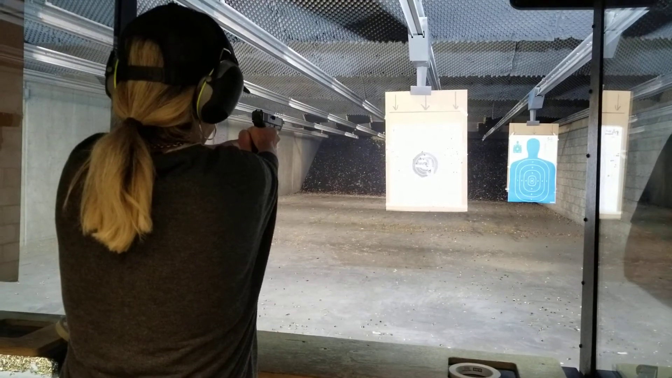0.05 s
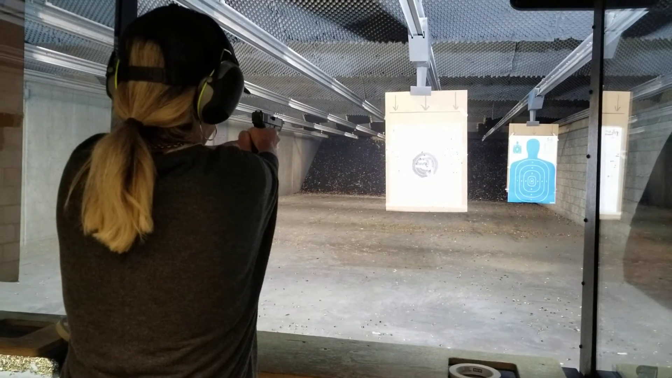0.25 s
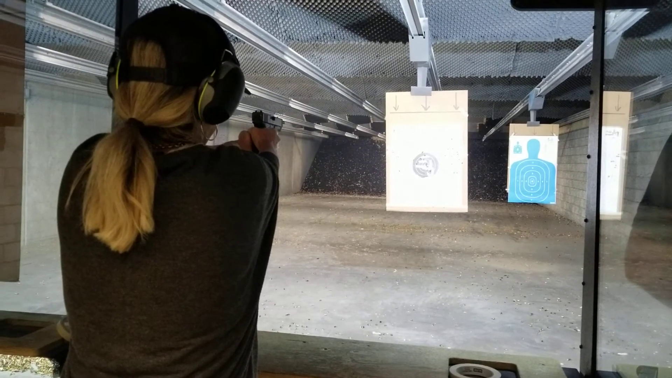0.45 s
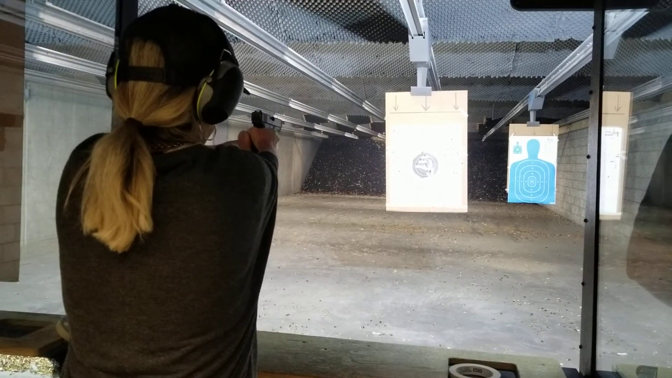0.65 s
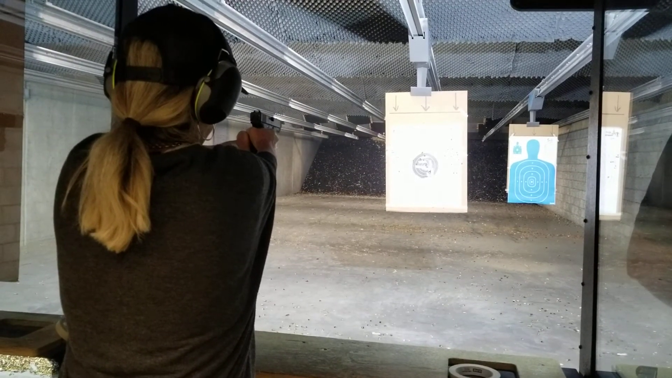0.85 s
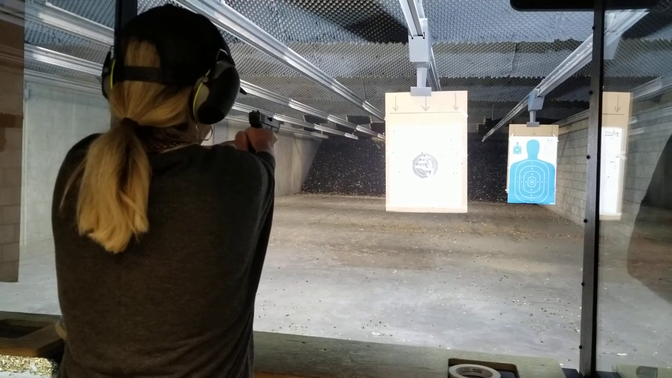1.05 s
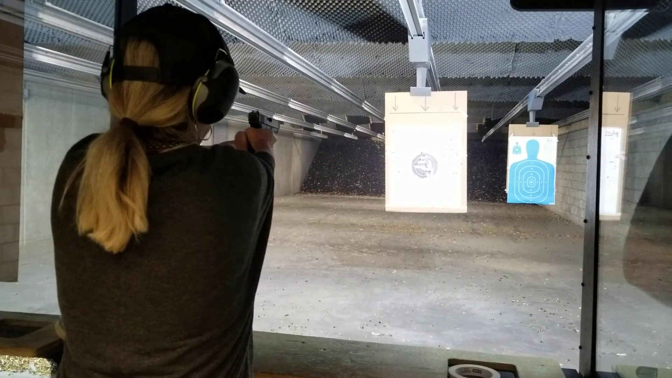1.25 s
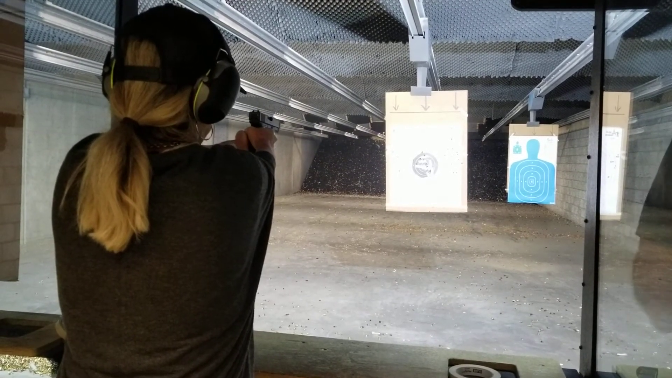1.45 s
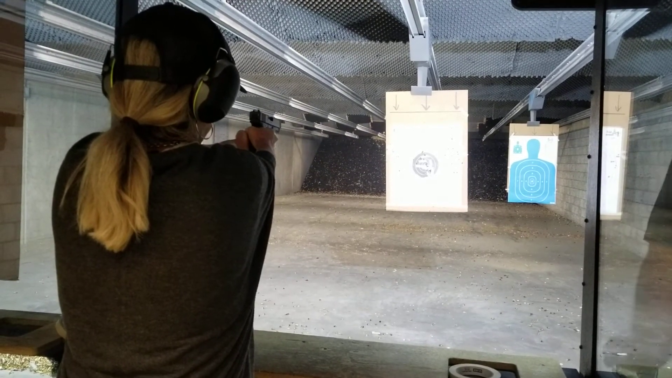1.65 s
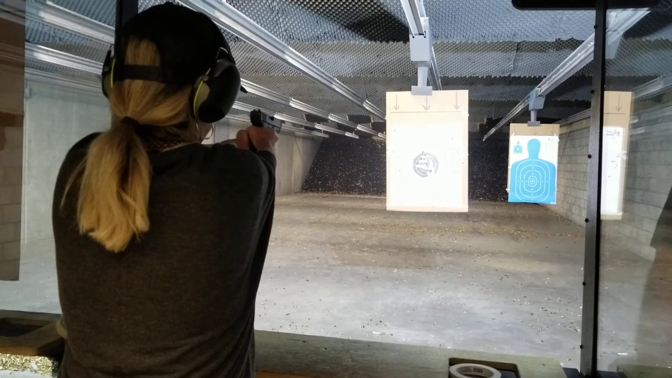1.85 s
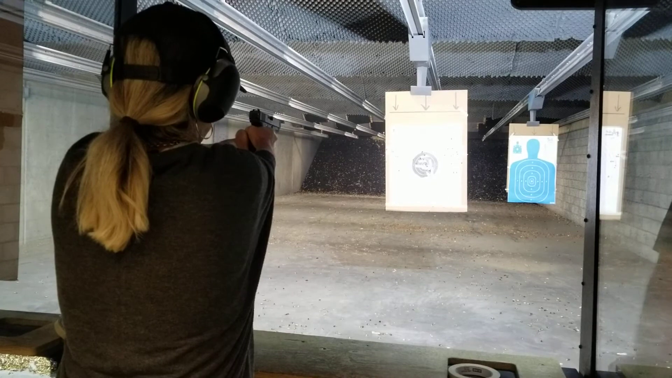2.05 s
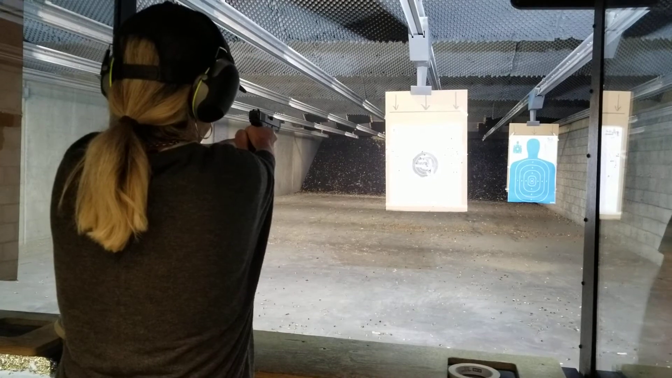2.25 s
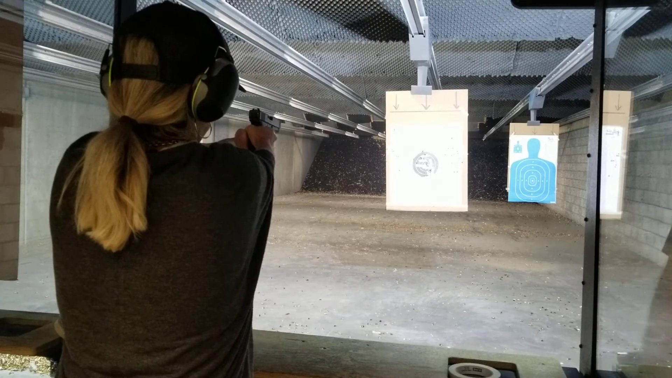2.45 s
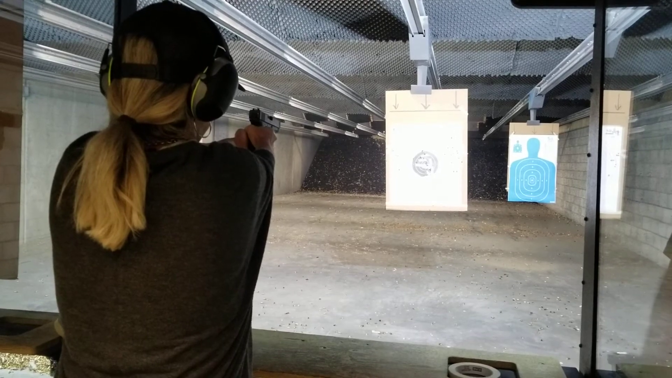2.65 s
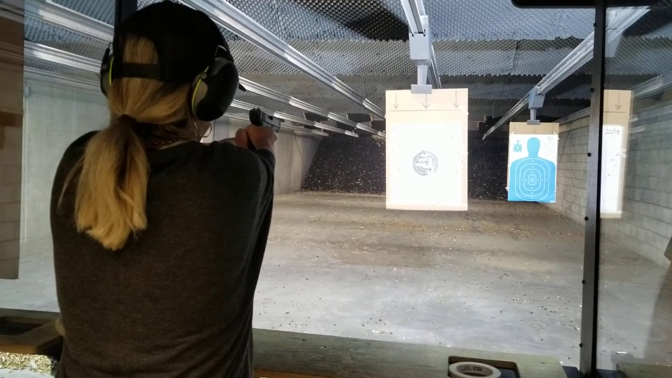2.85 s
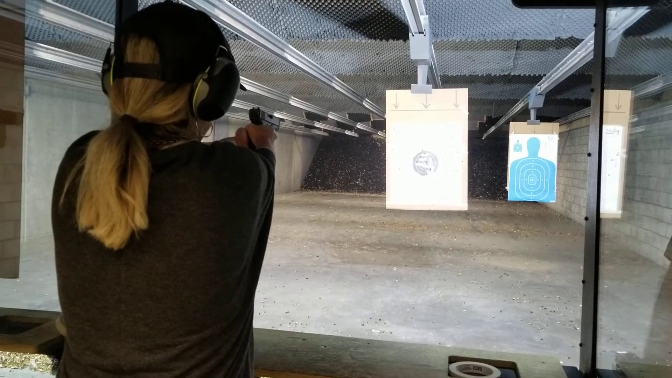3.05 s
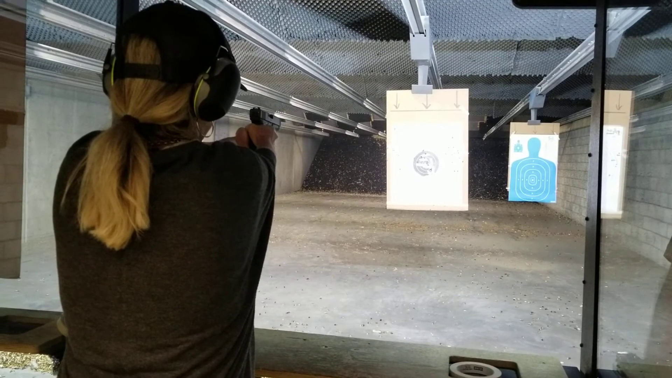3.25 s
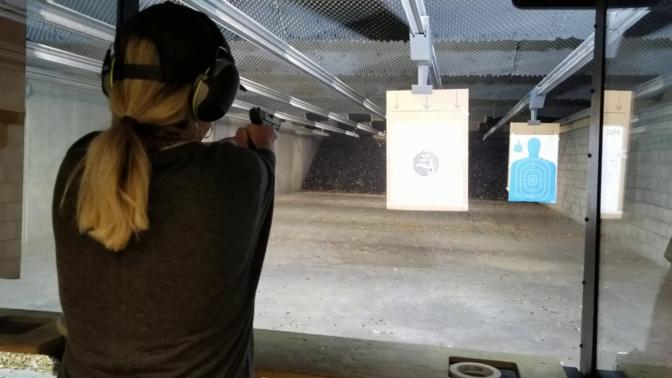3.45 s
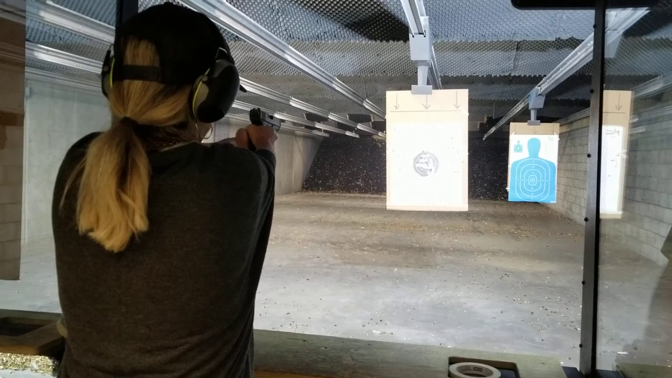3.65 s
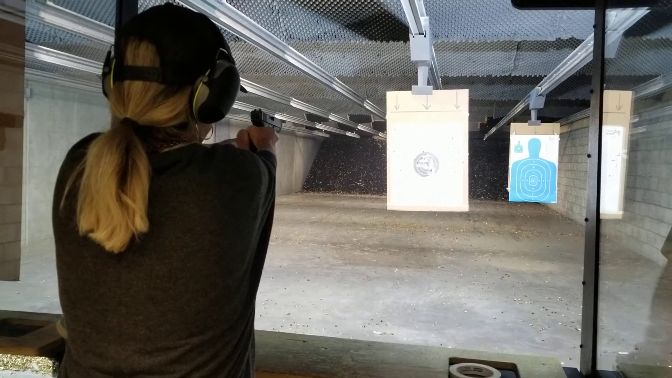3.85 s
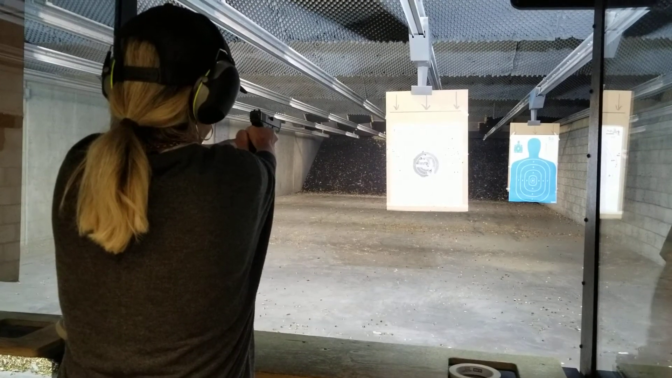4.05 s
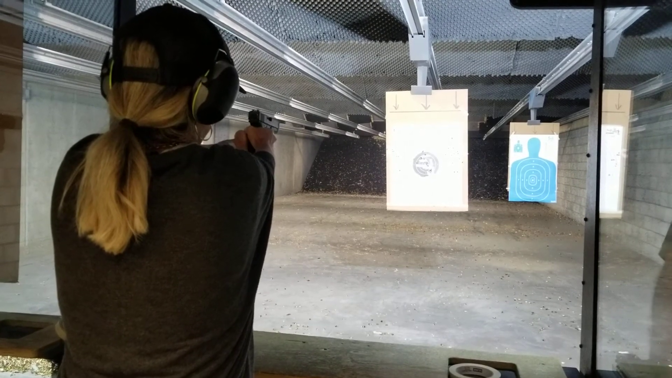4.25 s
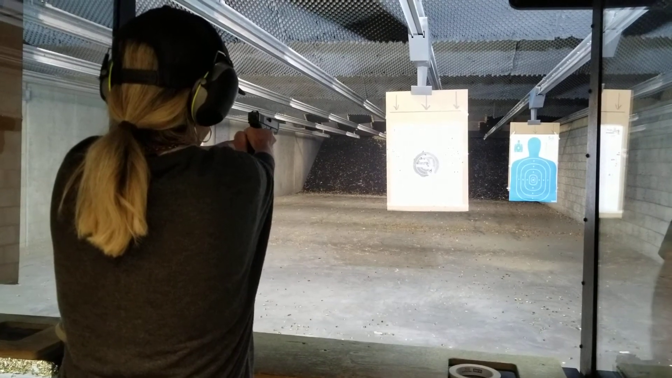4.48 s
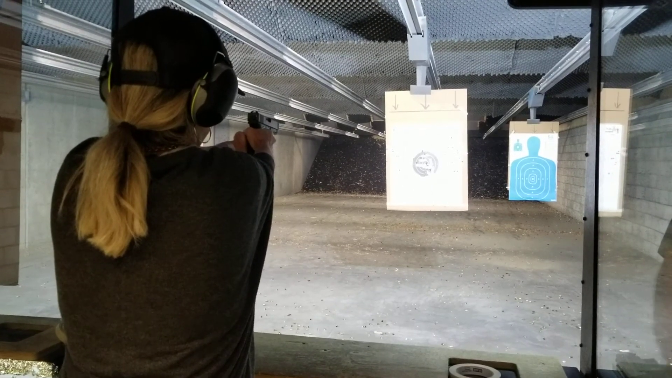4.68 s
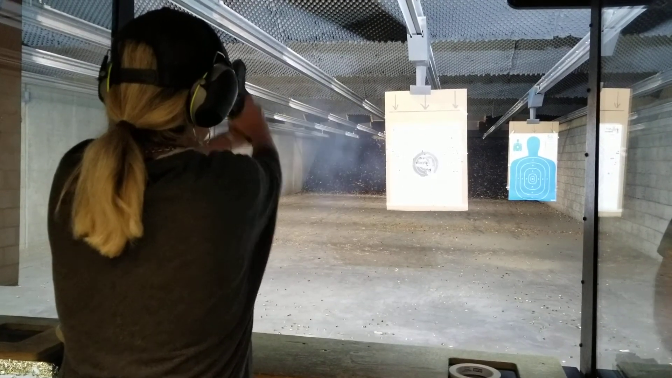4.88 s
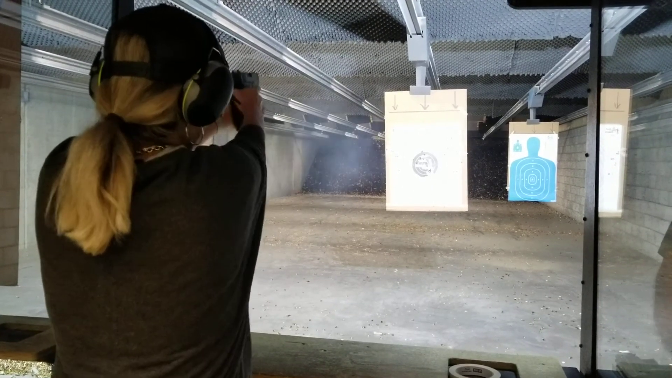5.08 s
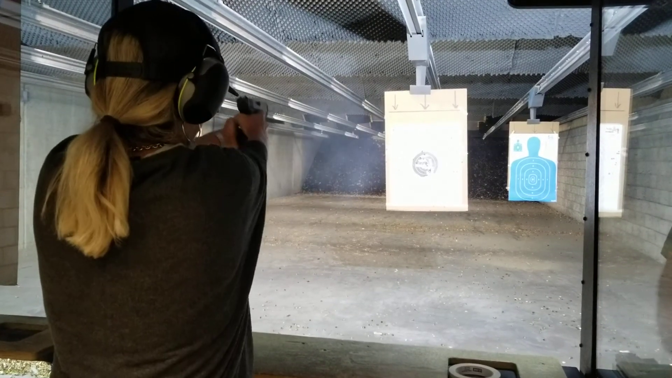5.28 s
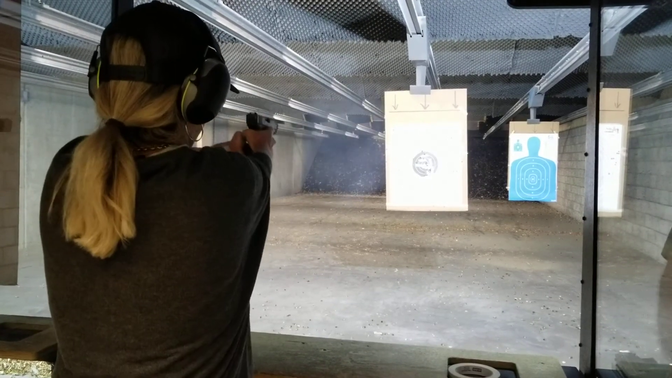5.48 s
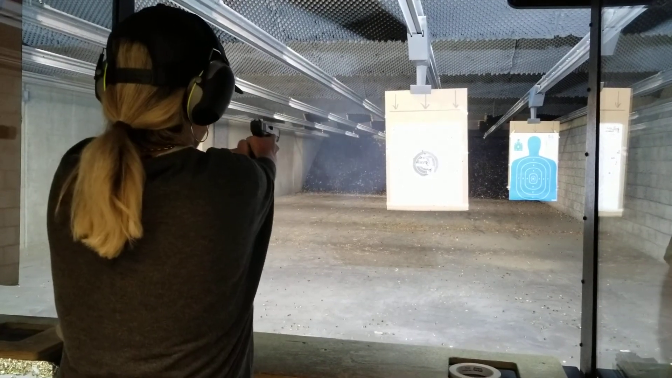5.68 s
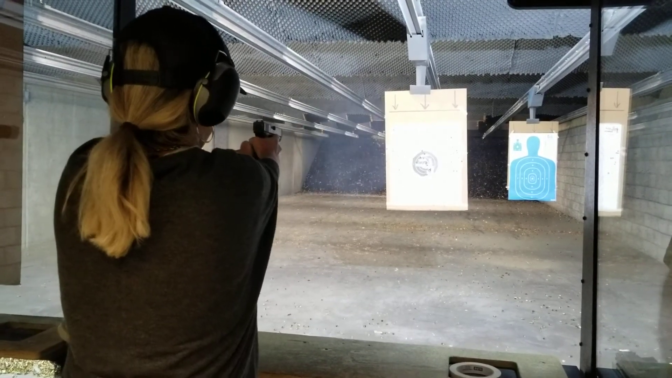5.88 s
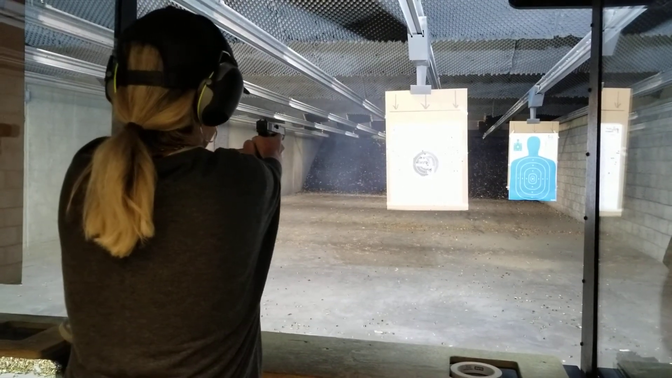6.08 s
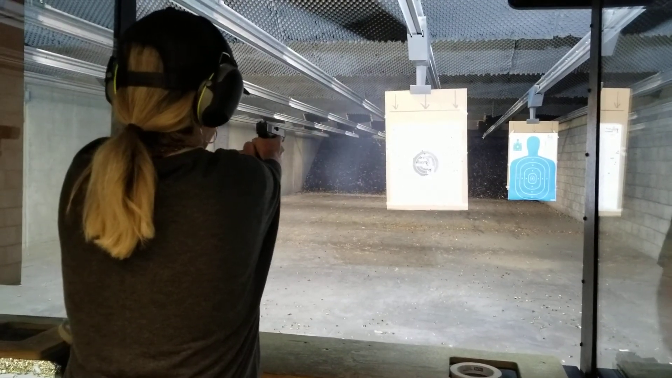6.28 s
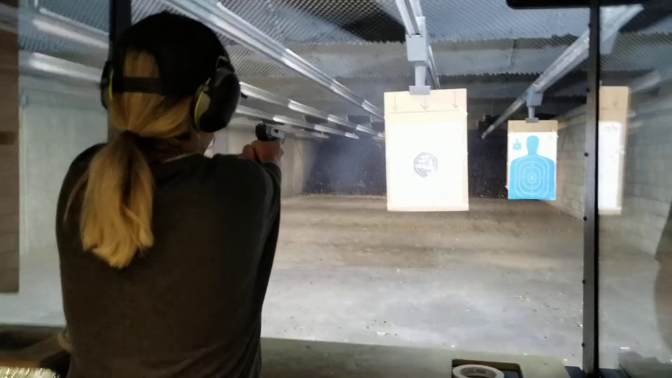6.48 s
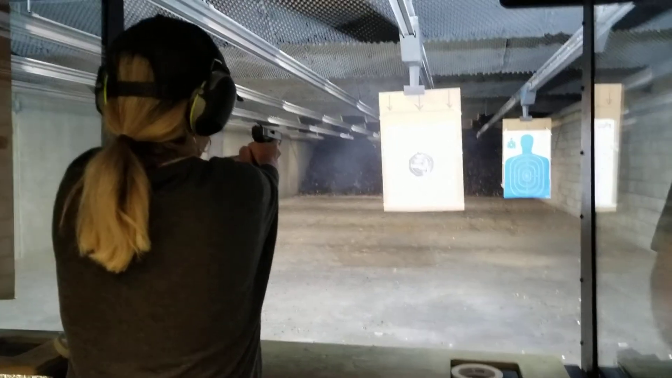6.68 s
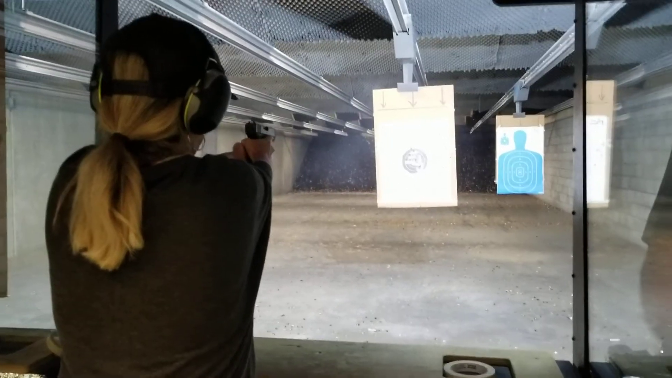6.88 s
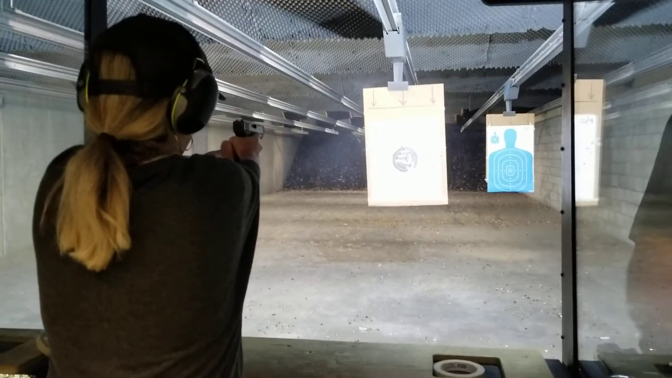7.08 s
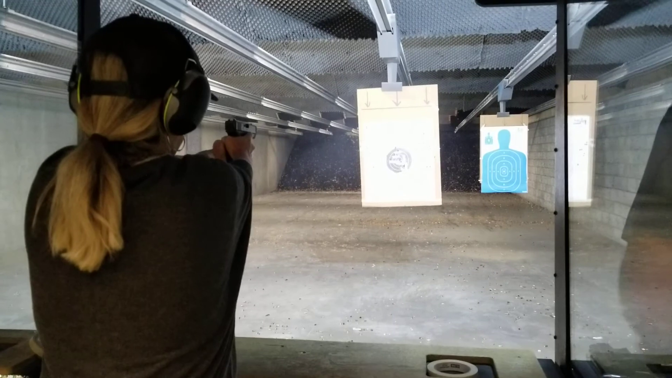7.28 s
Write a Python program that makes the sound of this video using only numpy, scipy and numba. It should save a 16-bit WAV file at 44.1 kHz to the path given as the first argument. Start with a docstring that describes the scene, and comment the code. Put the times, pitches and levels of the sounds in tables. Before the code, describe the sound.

A low ventilation rumble and fan hum fill a concrete indoor shooting range, with a very faint, thin electrical whine. Soft knocks, small clicks and rustles come from the next booth. At about 1.1 seconds a steel part snaps shut with a bright, short ring. A few knocks around 2.4 seconds lead to a hard case banging hollowly onto a bench at 2.7. After quieter handling, a pistol fires once, close by, at 4.8 seconds: by far the loudest sound, an overloaded blast with a sizzling crack, a deep boom and a tail fading over one to two seconds. Everything else ducks, then slowly recovers from about 6 seconds. The spent brass casing bounces on the floor with light, high pings at 5.7, 6.3 and 6.6 seconds, among a brief rustle and a small metallic clink. Two quick knocks land around 7 seconds.

```python
"""One pistol shot in a concrete indoor range. Over the drone of the ventilation, gear knocks and rustles
in the next booth, a steel part snaps shut (1.1 s) and a hard case bangs down on a bench (2.7 s).
At 4.8 s the pistol fires close by: the blast overloads the microphones and the gain control ducks
everything while the hall dies away. From 5.7 s the spent brass bounces on the floor and the level
slowly recovers; two more knocks land near the end."""
import sys
import numpy as np
from scipy import signal
from scipy.fft import rfft, irfft, next_fast_len
from scipy.io import wavfile
from scipy.ndimage import uniform_filter1d
from numba import njit

SR = 44100
rng = np.random.default_rng(int(sys.argv[2]) if len(sys.argv) > 2 else 0)


def materialize(psi):
    """Save the field psi as 16-bit PCM at rate SR to the path in sys.argv[1].

    A 1-D psi becomes a single channel; in a 2-D psi each row is a channel.
    """
    bounded = np.clip(np.atleast_2d(psi).T, -1, 1)
    quanta = np.round(bounded * 32767).astype(np.int16)
    wavfile.write(sys.argv[1], SR, quanta)


N = 323253
T = np.arange(N) / SR

# body of the muzzle blast (f/Hz, level/dB)
BLAST_EQ = [(30, 20.5), (70, 38), (150, 36.5), (280, 41.5), (410, 40.5), (520, 38.5), (750, 42.5),
            (1400, 39), (2800, 28.5), (4200, 26), (6000, 24), (10000, 20), (16000, 9.5)]
# slapbacks from down the lanes (delay t/s, level/dB)
SLAPBACKS = [(.011, 1), (.034, -4), (.058, -13.5), (.085, -12.5)]
# bright, short sizzling crack at the start of the overloaded shot (f/Hz, level/dB)
SHOT_CRACK_EQ = [(2000, 15), (7000, 27.5), (11000, 35), (16000, 28)]
# slow tail from the far end of the lanes (f/Hz, level/dB)
TAIL_EQ = [(300, -34), (700, -10.5), (1200, -5), (2000, -8.5), (3500, -27.5), (7000, -44.5)]
# boom of a panel shaken by the blast (f/Hz, level/dB, 60 dB decay t/s)
PANEL_MODES = [(97, 4.5, 1.5), (146, 5.5, 0.65)]

def shot(at_s=4.794, front_db=-20, front_half_s=.00054, crack_t60=.19, tail_t60=2.0):
    """An N-shaped pressure front and its slapbacks fill the hall; a crack sizzles and a panel booms."""
    blast = np.zeros((2, N))
    for delay, db in [(0, 0)] + SLAPBACKS:
        path = room(booth_t60=.2, hall_db=-22.5, build_s=.0012)
        add(blast, at_s + delay, undb(db) * path)
    front = np.linspace(1, -1, int(2 * front_half_s * SR))
    add(blast, at_s, undb(front_db) * front)
    blast = colour(blast * np.sqrt(SR / 50), BLAST_EQ)  # same energy scale as contact()
    add(blast, at_s, colour(diffuse(SR), SHOT_CRACK_EQ) * fade(T[:SR], crack_t60))
    add(blast, at_s, colour(diffuse(2 * SR), TAIL_EQ) * fade(T[:2 * SR], tail_t60))
    add(blast, at_s, ring(PANEL_MODES))
    return blast


# clicks of spent brass on the floor, the first followed 10 ms later by its reflection
# (t/s, click level/dB, top-end level/dB, ring level/dB re click)
BRASS_CLICKS = [(5.749, -27, -3, 2), (5.759, -22, -3, 1), (6.347, -21.5, 0, -2), (6.592, -23.5, -3, 2),
                (6.73, -31.5, -3, -14)]
# ping of the brass tube (f/Hz, level/dB, 60 dB decay t/s)
BRASS_MODES = [(3920, -22, 0.036), (4350, -14, .05), (6907, -16.5, 0.25), (11550, -24, .22),
               (13750, -30, .18)]
# brass-on-concrete click, below its top end (f/Hz, level/dB)
BRASS_CLICK_EQ = [(500, -20), (1800, -8), (4000, -5.5), (6000, -5), (8000, 0.5)]
# glint on the sound that comes straight off the floor (f/Hz, level/dB)
GLINT_EQ = [(1500, -13), (3500, -1), (8000, -1), (10500, -4), (12500, 8), (15000, -1)]

def casing(response, direct_db=-1, room_db=1.5, predelay_s=.004):
    """The brass casing clicks on concrete and rings; the duller room answers a moment later."""
    brass = np.zeros(N)
    for s, db, top_db, ring_db in BRASS_CLICKS:
        eq = BRASS_CLICK_EQ + [(12000, top_db - 4), (15000, top_db)]
        add(brass, s, undb(db + ring_db) * ring(BRASS_MODES))
        add(brass, s, undb(db) * colour(contact(.003, scatter=.89), eq))
    out = np.tile(undb(direct_db) * colour(brass, GLINT_EQ), (2, 1))
    add(out, predelay_s, undb(room_db) * reverb(brass, response))
    return out


# a steel part snapping shut (t/s, level/dB)
CLANKS = [(1.149, -12.5), (1.156, 2.5), (1.168, -4)]
# its bright crack (f/Hz, level/dB)
STEEL_EQ = [(600, -47), (1200, -31), (3000, -27.5), (4600, -25.5), (6000, -31.5), (9000, -18.5),
            (12000, -24), (16000, -36.5)]
# its metallic ring (f/Hz, level/dB, 60 dB decay t/s)
STEEL_MODES = [(1245, -31, .1), (1752, -39, .1), (2800, -36, .05), (3240, -41, .1), (4604, -28.5, .07),
               (6872, -38, .1), (11200, -29, .06), (11500, -28.5, .07)]

def clank():
    """Steel slides home in three quick contacts and rings from the hardest."""
    out = np.zeros(N)
    for s, db in CLANKS:
        add(out, s, undb(db) * colour(contact(.006), STEEL_EQ))
    add(out, CLANKS[1][0], ring(STEEL_MODES))
    return out


# a hard case banged down on a bench (t/s, level/dB)
BANGS = [(2.740, -16.5), (2.745, -10), (2.749, -4.5)]
# its hollow crack (f/Hz, level/dB)
BANG_EQ = [(100, -5), (200, -31), (350, -0.5), (520, -8.5), (850, -3), (1300, -9.5), (2000, -11.5),
           (3200, -17), (4500, -23), (6800, -26.5), (9000, -26.5), (16000, -42)]

def bang():
    """One edge touches, then the whole case lands."""
    out = np.zeros(N)
    for s, db in BANGS:
        add(out, s, undb(db) * colour(contact(.00137, scatter=.5), BANG_EQ))
    return out


# gear set down (t/s, contact t/s, body level/dB, crack level/dB re body, ring f/Hz)
KNOCKS = [(0.001, 0.054, -22, -19.5, 1633), (.056, 0.03, -27, -21.5, 1610), (.112, 0.021, -29, -14, 1590),
          (2.392, .012, -19.5, -14, 1930), (2.431, 0.023, -21.5, -14.5, 380),
          (2.503, 0.018, -22.5, -14, 735), (4.067, 0.017, -36, -15.5, 2004),
          (6.953, 0.0076, -11.5, -27.5, 710), (7.001, 0.0065, -11, -24.5, 771)]

def knocks(ring_db=-7, ring_t60=.049, sizzle_db=-7, bass_db_per_doubling=5.5, firm_contact_s=.018):
    """Blows on a bench: hollow body, crack and sizzle from hard edges; the object rings briefly."""
    out = np.zeros(N)
    for s, contact_s, body_db, crack_db, hz in KNOCKS:
        # a softer, longer contact pushes more bass into the bench
        bass_db = bass_db_per_doubling * np.log2(contact_s / firm_contact_s)
        top_db = crack_db + sizzle_db
        body_eq = [(100, bass_db - 16), (370, bass_db - 4.5), (520, -5), (850, -1.5), (1300, -3.5)]
        edge_eq = [(3200, crack_db), (6500, crack_db - 3), (11000, top_db), (16000, top_db - 3)]
        add(out, s, undb(body_db) * colour(contact(contact_s, scatter=4.5), body_eq + edge_eq))
        add(out, s, ring([(hz, body_db + ring_db, ring_t60)]))
    return out


# small hard parts being handled (t/s, contact t/s, level/dB, sizzle level/dB re click)
CLICKS = [(0.261, .014, -45.5, -15), (.331, 0.023, -38, -5), (.601, 0.066, -38.5, -10),
          (0.833, 0.0021, -42.5, -12), (1.29, 0.026, -38, -24), (1.788, 0.0054, -51, -15),
          (3.024, .006, -46, -6), (3.085, 0.0045, -49, -8), (4.263, 0.0043, -38, -20),
          (5.422, .009, -28, -18), (5.456, .009, -20.5, -19), (5.506, .012, -22.5, -19),
          (6.665, .002, -23, -5)]
# their shared tone below the sizzle (f/Hz, level/dB)
CLICK_EQ = [(100, -17), (370, -6), (800, -2.5), (1300, -1.5), (3200, -2.5), (6500, -1.5)]
# clink of a small metal piece (f/Hz, level/dB, 60 dB decay t/s)
CLINK_MODES = [(2869, -41, .16), (4960, -35, 0.22), (5356, -33, 0.21), (5100, -38, .16)]

def clicks():
    """Light, hard contacts with little body; the last one sets metal ringing."""
    out = np.zeros(N)
    for s, contact_s, db, sizzle_db in CLICKS:
        eq = CLICK_EQ + [(11000, sizzle_db), (16000, sizzle_db - 3)]
        add(out, s, undb(db) * colour(contact(contact_s, scatter=4.5), eq))
    add(out, CLICKS[-1][0], ring(CLINK_MODES))
    return out


# sleeves and packaging (peak t/s, half-width t/s, level/dB, sizzle level/dB re body)
RUSTLES = [(0.499, 0.032, -42, 12.5), (0.93, 0.1, -51, 7), (1.806, 0.037, -42.5, -19),
           (1.98, 0.042, -53, 5.5), (2.248, 0.042, -55.5, 7), (2.437, 0.025, -35.5, 9.5),
           (2.672, 0.044, -46, -2), (3.468, 0.077, -59, 11.5), (3.553, .032, -44.5, 8.5),
           (4.015, 0.029, -44.5, -15), (4.481, .045, -53, -14), (6.138, 0.021, -23.5, 7.5),
           (6.72, 0.041, -37, -7), (7.199, .015, -53, 15)]

def rustles(grain_db=4.5):
    """Surfaces rub in grainy swells of tiny uneven slips."""
    body_level, sizzle_level = np.zeros((2, N))
    for s, half_s, db, sizzle_db in RUSTLES:
        swell = undb(db) * np.exp(-((T - s) / half_s) ** 2)
        body_level += swell
        sizzle_level += swell * undb(sizzle_db)
    slips = rng.standard_normal((2, N)) * undb(grain_db * walk(400))
    slips /= slips.std()
    body = colour(slips[0], [(400, -16), (1800, 1.5), (6500, -1.5), (10000, -8.5)])
    sizzle = colour(slips[1], [(5000, -15), (9000, -3.5), (16000, -16.5)])
    return body_level * body + sizzle_level * sizzle


# two dry ticks up close (t/s, level/dB)
CLOSE_TICKS = [(6.481, -40), (6.523, -32)]
# their thin, crisp tone (f/Hz, level/dB)
TICK_EQ = [(500, -20), (1800, -12), (4200, -3), (6000, -2), (8000, -9), (15000, -16)]

def close_ticks():
    """Tiny contacts, too close and too faint to wake the room."""
    out = np.zeros(N)
    for s, db in CLOSE_TICKS:
        add(out, s, undb(db) * colour(contact(.002, scatter=1.0), TICK_EQ))
    return out


def faint_ticks(per_s=5, mean_db=-56, spread_db=2.5):
    """Buttons, buckles and cartridges touch at random, barely above the air noise."""
    out, s = np.zeros(N), 0.
    for gap, size, bright in rng.standard_normal((60, 3)):
        s += np.exp(.5 * gap) / per_s
        if s >= N / SR:
            break
        sizzle_db = -9 + 5 * bright
        tick = colour(contact(.0033), CLICK_EQ + [(11000, sizzle_db), (16000, sizzle_db - 3)])
        add(out, s, undb(mean_db + spread_db * size) * tick)
    return out


def fidgeting(level_db=-63.5, spread_db=4, changes_per_s=7.1):
    """Hands never quite rest: faint cloth noise comes and goes on all sides."""
    cloth = colour(diffuse(N), [(400, -14.5), (1800, 1.5), (6500, 1.5), (10000, -3.5), (16000, -14.5)])
    return cloth * undb(level_db + spread_db * walk(changes_per_s))


# rumbling bed of moving air (f/Hz, level/dB)
AIR_EQ = [(20, -22), (32, -17), (41, 5), (85, 3), (130, -3.5), (250, -11.5), (320, -19), (460, -24),
          (700, -24), (950, -32), (2000, -38), (3200, -50.5), (7000, -53), (15000, -59)]
# duct resonances (f/Hz, bandwidth f/Hz, rms level/dB)
DUCT_MODES = [(61, 13, -36), (160.64, 5, -41.5), (226.8, 26, -40.5)]

def ventilation(air_db=-14, flutter_db=.5, fan_hz=63.2, fan_db=-29.5, wander_hz=.9, throb_db=.6):
    """Air noise rings the ducts over the wavering hum of the fan."""
    air = colour(diffuse(N), AIR_EQ) * undb(air_db + flutter_db * walk(7.8))
    for hz, width, db in DUCT_MODES:
        resonator = signal.tf2sos(*signal.iirpeak(hz, hz / width / 2, fs=SR))
        boom = signal.sosfilt(np.tile(resonator, (2, 1)), diffuse(N))
        air += boom * undb(db) / boom.std()
    phase = 2 * np.pi * np.cumsum(fan_hz + wander_hz * walk(6)) / SR
    hum = np.sqrt(2) * np.sin(phase) * undb(fan_db + throb_db * walk(7.8))
    return air + hum


# fader ride of the whine (t/s, rms level/dB)
WHINE_LEVELS = [(0, -64.5), (3.9, -63.5), (4.3, -70), (7.33, -74.5)]

def whine(hz=15656):
    """A thin electrical tone at the top of hearing."""
    level_db = np.interp(T, *np.transpose(WHINE_LEVELS))
    return np.sqrt(2) * np.sin(2 * np.pi * hz * T) * undb(level_db)


# reverb time of the concrete hall (f/Hz, 60 dB decay t/s)
HALL_DECAY = [(60, 1), (250, .85), (600, 0.81), (1600, 0.84), (4000, 0.77), (7000, 0.77), (11000, .62),
              (16000, .54)]

def room(booth_t60, hall_db, build_s):
    """Stereo response: quick reflections in the booth, then the long hall, whose treble dies first."""
    t = T[:2 * SR]
    noise, hz = rfft(diffuse(len(t))), np.fft.rfftfreq(len(t), 1 / SR)
    centres, hall = np.transpose(HALL_DECAY)[0], 0
    for share, (_, t60) in zip(np.eye(len(HALL_DECAY)), HALL_DECAY):
        band = along(np.transpose([centres, share]), hz)
        hall = hall + irfft(noise * band) * fade(t, t60)
    booth = diffuse(len(t)) * fade(t, booth_t60)
    attack = 1 - np.exp(-t / build_s)
    spectrum = rfft((booth + undb(hall_db) * hall) * attack)
    # the walls favour no broad band: only the fine comb of the reflections remains
    spectrum /= np.sqrt(uniform_filter1d(np.abs(spectrum) ** 2, size=300))
    return irfft(spectrum)[:, :len(t) - SR // 4]


def reverb(x, response):
    """A mono sound spread through the room."""
    return signal.fftconvolve(x[None], response, axes=1)[:, :N]


def contact(seconds, scatter=2.44):
    """One sharp touch and a short scatter of fine impacts, with the energy of 20 ms at full level."""
    envelope = np.exp(-2 * T[:SR // 4] / seconds)
    x = rng.standard_normal(SR // 4) * envelope
    x *= scatter / np.sqrt(np.sum(x ** 2))
    x[0] += 1
    # a contact has no pitch of its own: flatten the spectrum, keep the hit short
    for _ in range(6):
        flat = np.exp(1j * np.angle(rfft(x)))
        x = irfft(flat, len(x)) * envelope ** .25
    return x * np.sqrt(SR / 50 / np.sum(x ** 2))


def ring(modes):
    """Damped sines from (f/Hz, level/dB, 60 dB decay t/s) rows."""
    t = T[:2 * SR]
    return sum(undb(db) * np.sin(2 * np.pi * hz * t) * fade(t, t60) for hz, db, t60 in modes)


def diffuse(count, spacing_m=.17):
    """White noise from all sides at two microphones: centred in the bass, wide in the treble."""
    coherence = np.sinc(2 * np.fft.rfftfreq(count, 1 / SR) * spacing_m / 343)
    mid, side = rfft(rng.standard_normal((2, count)))
    mid *= np.sqrt((1 + coherence) / 2)
    side *= np.sqrt((1 - coherence) / 2)
    return irfft(np.array([mid + side, mid - side]), count)


def colour(x, points):
    """Minimum-phase EQ through (f/Hz, level/dB) points."""
    size = next_fast_len(x.shape[-1] + 4096, True) * 2
    gain = undb(along(points, np.fft.rfftfreq(size, 1 / SR)))
    cepstrum = irfft(np.log(gain))
    # fold onto positive time, so nothing rings ahead of a hit
    cepstrum[1:size // 2] *= 2
    cepstrum[size // 2 + 1:] = 0
    return irfft(rfft(x, size) * np.exp(rfft(cepstrum)))[..., :x.shape[-1]]


def along(points, hz):
    """Read (f/Hz, value) points on a log-frequency axis."""
    f, value = np.transpose(points)
    return np.interp(np.log(hz + 1e-9), np.log(f), value)


def walk(per_s):
    """Smooth random modulation with a spread of 1."""
    k = int(SR / per_s)
    steps = np.repeat(rng.standard_normal(N // k + 1), k)
    smooth = uniform_filter1d(uniform_filter1d(steps, k), k)[:N]
    return smooth / smooth.std()


def fade(t, t60):
    """Decay that loses 60 dB in t60."""
    return np.exp(-np.log(1000) * t / t60)


def undb(db):
    """Decibels to gain."""
    return 10 ** (np.asarray(db) / 20)


def add(track, s, x):
    """Mix x into the track at time s."""
    i = int(s * SR)
    track[..., i:i + x.shape[-1]] += x[..., :N - i]


def scene(bang_near_db=-6, clank_near_db=-4):
    """The shooter's lane is up front; the screened-off next booth is heard through the room."""
    response = room(booth_t60=.24, hall_db=-22.5, build_s=.0006)
    short_paths = room(booth_t60=.06, hall_db=-43, build_s=.0009)
    own_lane = shot() + ventilation() + whine() + casing(response) + close_ticks() + fidgeting()
    case, steel = bang(), clank()
    next_booth = reverb(case + steel + knocks() + clicks() + rustles() + faint_ticks(), response)
    round_the_screen = reverb(undb(bang_near_db) * case + undb(clank_near_db) * steel, short_paths)
    return own_lane + next_booth + round_the_screen


@njit
def hold_and_release(over, hold, step):
    """Follow a rise at once, hold, then sink by one step per sample."""
    out, cut, wait = np.empty(len(over)), 0., 0.
    for i in range(len(over)):
        wait -= 1
        if over[i] >= cut:
            cut, wait = over[i], hold
        elif wait < 0:
            cut = max(cut - step, 0.)
        out[i] = cut
    return out


def gain_control(x, limit_db=-12.5, hold_s=1.125, release_db_per_s=9):
    """Ducking gain: looks a few ms ahead and turns down by as much as the level exceeds the limit."""
    power = uniform_filter1d(np.mean(x ** 2, axis=0), size=440)
    over_db = np.maximum(10 * np.log10(np.abs(power) + 1e-12) - limit_db, 0)
    cut_db = hold_and_release(over_db, float(hold_s * SR), release_db_per_s / SR)
    return undb(-uniform_filter1d(cut_db, size=130))


def record(dry, overload_db=24.0, top_hz=15900):
    """The microphones saturate, their ports colour the sound, the gain ducks and the top is cut."""
    saturated = undb(overload_db) * np.tanh(dry / undb(overload_db))
    left = colour(saturated[0], [(15, -10.5), (45, -1.5), (300, 2.5), (700, 3), (2500, 4),
                                 (7000, .5), (9000, -9.5), (12000, -2), (16000, 3)])
    right = colour(saturated[1], [(15, -13), (45, -2.5), (300, 1.5), (700, 1), (2500, 2.5),
                                  (7000, 2.5), (9000, -13), (12000, -1), (16000, -4.5)])
    ducked = np.array([left, right]) * gain_control(saturated)
    high_cut = signal.ellip(10, .2, 70, top_hz, fs=SR, output="sos")
    return signal.sosfilt(high_cut, ducked)


dry = scene()
out = record(dry)
materialize(out)
```